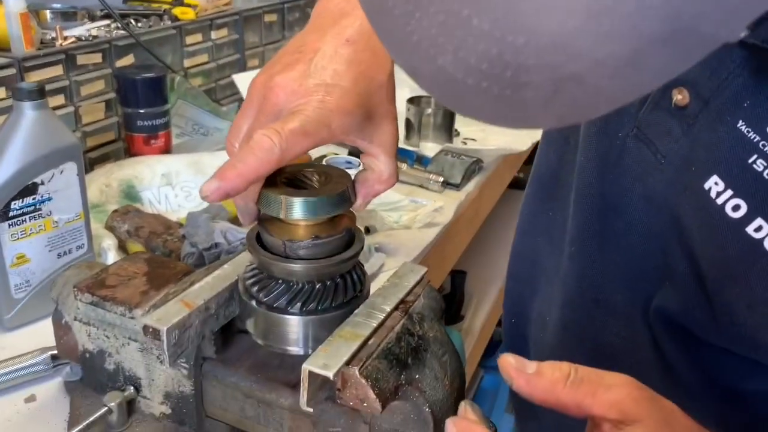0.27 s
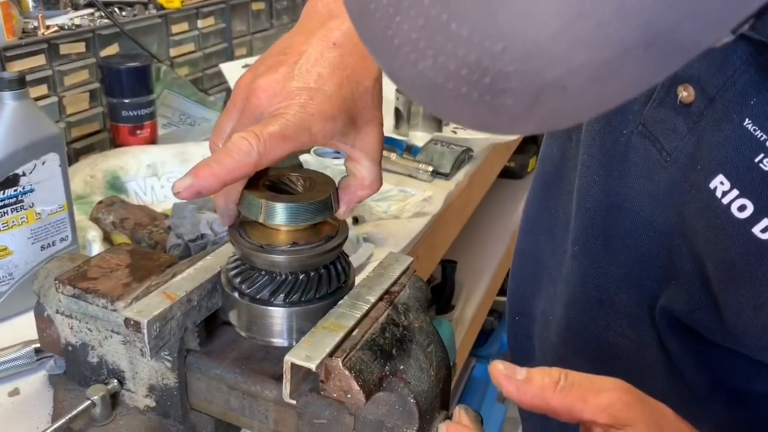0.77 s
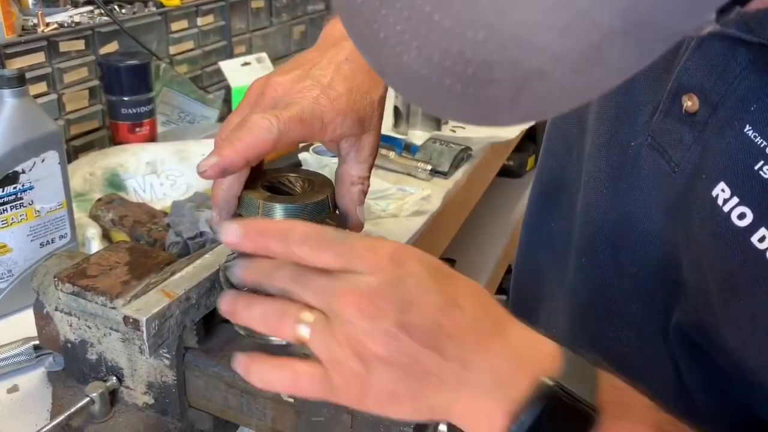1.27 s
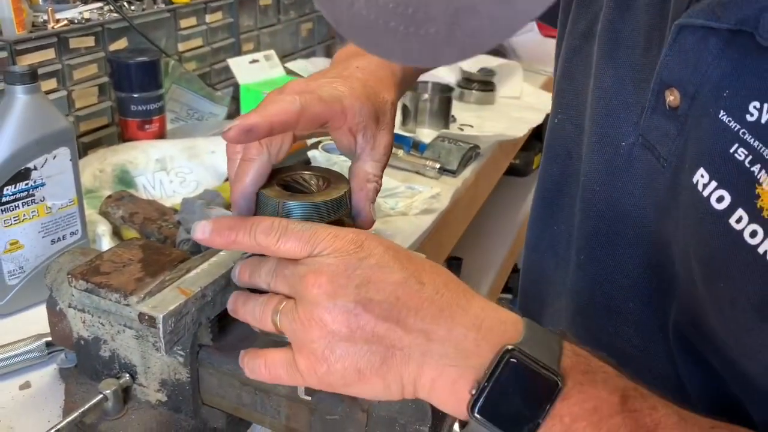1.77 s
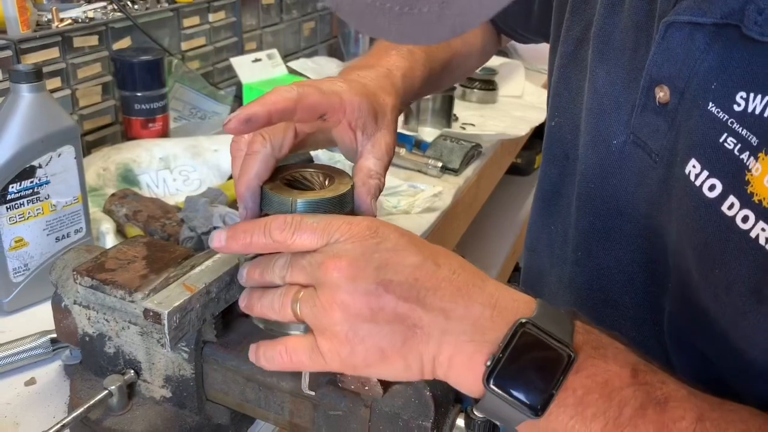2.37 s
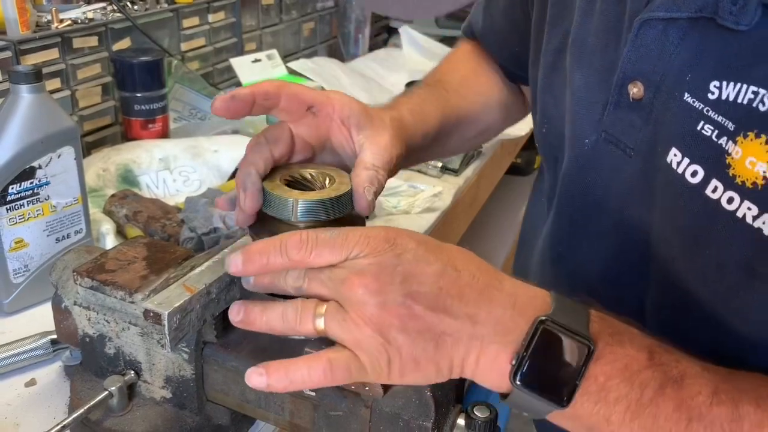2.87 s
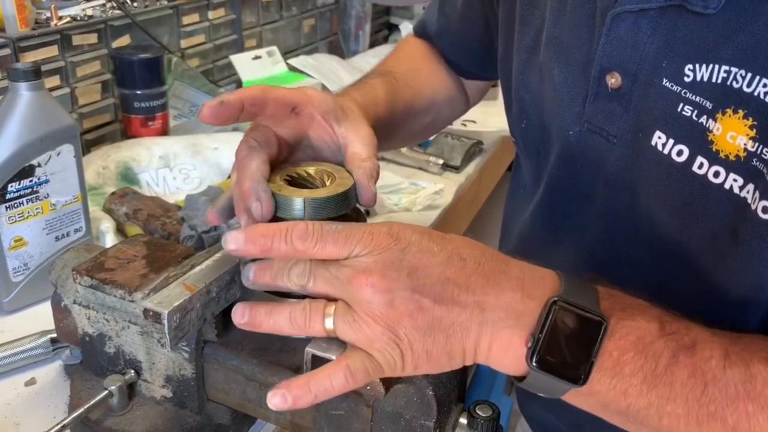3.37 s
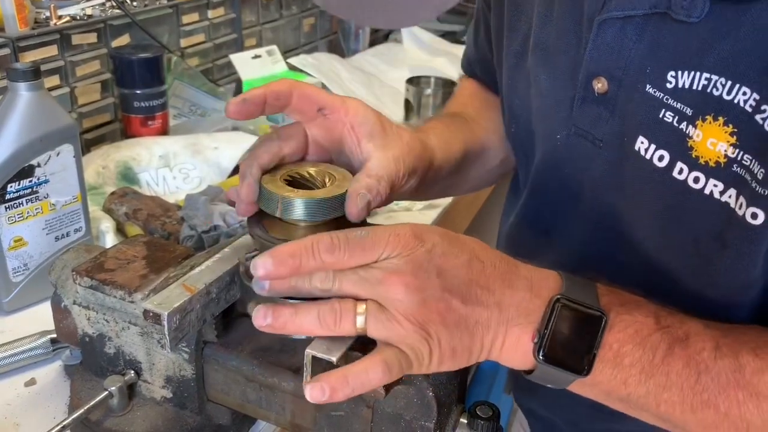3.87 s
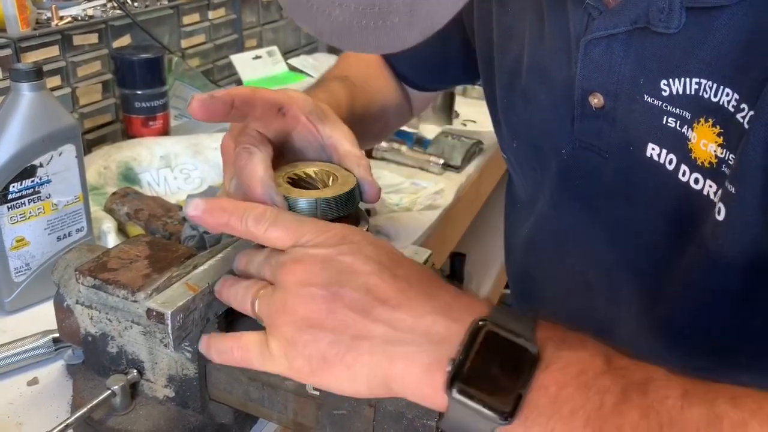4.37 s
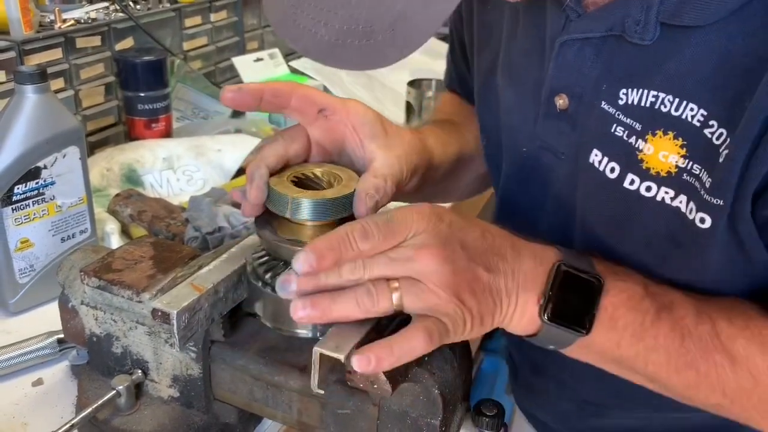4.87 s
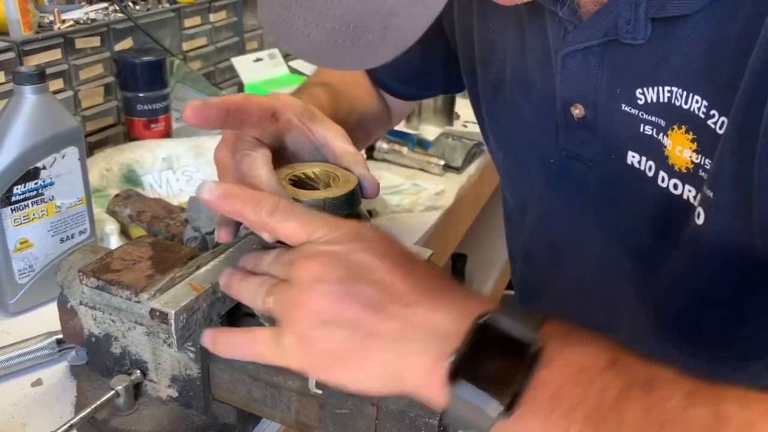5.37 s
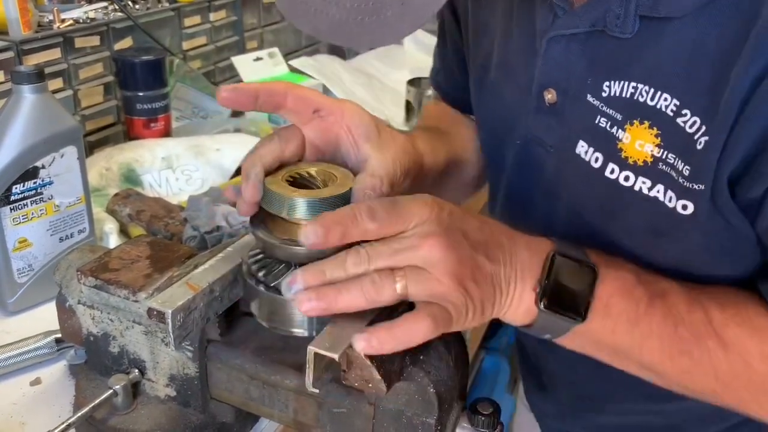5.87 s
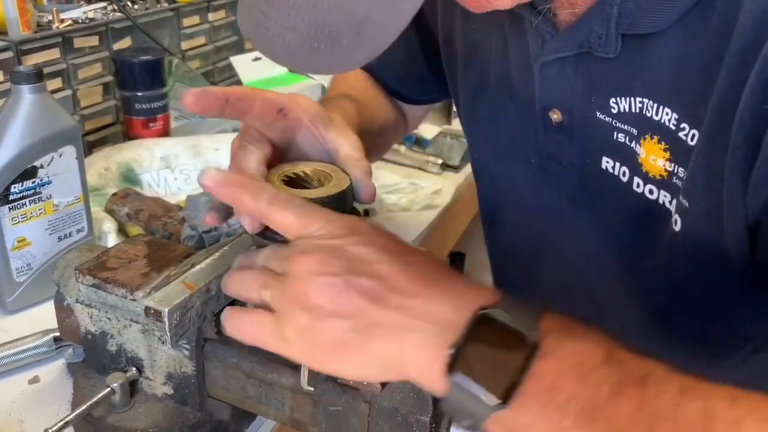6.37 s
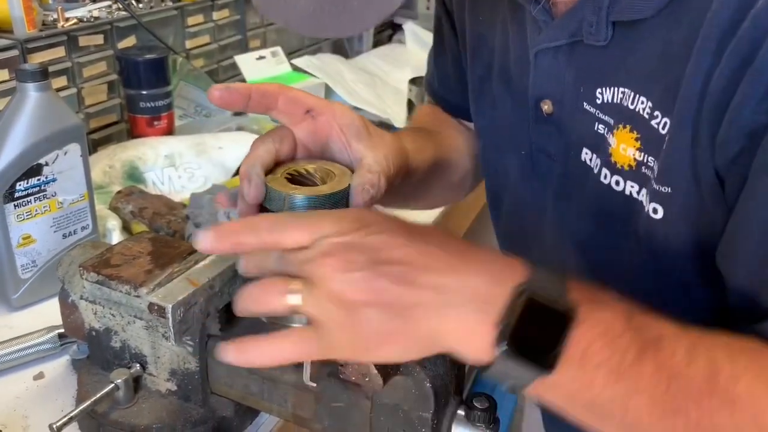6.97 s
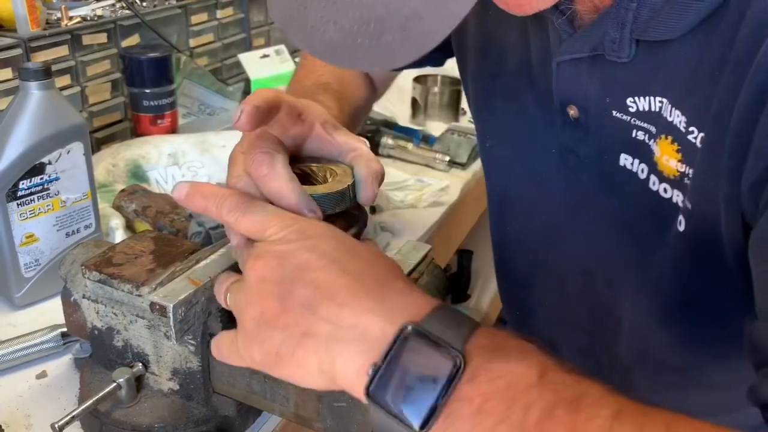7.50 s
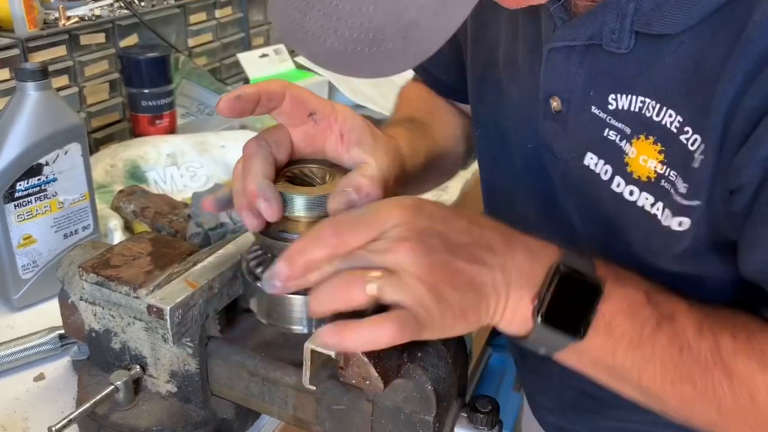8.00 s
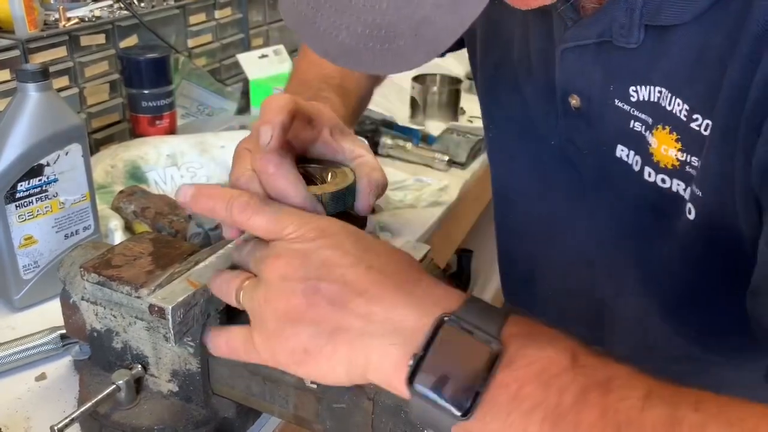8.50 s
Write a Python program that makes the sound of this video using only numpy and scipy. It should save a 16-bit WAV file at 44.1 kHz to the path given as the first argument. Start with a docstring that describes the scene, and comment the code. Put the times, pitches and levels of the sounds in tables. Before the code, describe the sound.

Gritty metal-on-metal grinding by hand in short back-and-forth scrapes, after a few knocks and ticks, with a far motor humming in a workshop.

```python
"""A metal cone is lowered into its cup, held in a bench vise, and turned to and fro by hand on grinding paste.
Random grit in the joint shakes the ringing modes of bench, cup and hard rim, and also hisses directly.
Ticks, knocks, light scuffs, thin squeaks and a soft wash of noise surround the strokes.
Behind it all a far machine throbs as a stack of shaft orders, over the noise of the shop air."""
import sys
import numpy as np
from scipy import signal
from scipy.fft import rfft, irfft, next_fast_len
from scipy.io import wavfile

SR = 44100
rng = np.random.default_rng(int(sys.argv[2]) if len(sys.argv) > 2 else 0)


def int16_out(signal):
    """Quantize to a 16-bit WAV file."""
    q = np.round(np.clip(np.atleast_2d(signal).T, -1, 1) * 32767)
    wavfile.write(sys.argv[1], SR, q.astype(np.int16))


def rack_gain(trim_db):
    """Turn a fader trim in dB into the linear factor to multiply a signal by."""
    fader = np.asarray(trim_db, float)
    return 10 ** (fader / 20)


N = 385434
SIZE = next_fast_len(N + SR // 2)  # room for ringing after the end
HZ = np.fft.rfftfreq(SIZE, 1 / SR)
T = np.arange(N) / SR

# Modes of the hard rim, then of the cone itself, which rings mostly while it hangs free. Each row: pitch in Hz,
# width in Hz, relative level in dB, left over right in dB, phase lead of the left in radians.
RIM_MODES = [(10580, 80, -10, 0, -2), (10960, 45, 0, -1, -2.8), (11150, 120, -6, 0, 3.1),
             (13200, 50, -10, 0, .1), (14330, 60, -17, 0, -.6), (14480, 60, -15, 0, -1)]
CONE_MODES = [(4600, 180, -13.5, 0.0073, -17.5), (6160, 270, 7.5, 0.04, 2.5), (6560, 120, 6, 0.0027, 3),
              (8200, 380, -4, 0.029, 4.5), (11500, 140, -23, 0.025, -1), (11900, 260, 2, 0.026, 8),
              (14030, 100, -11, 0.019, -3.5)]


def to_db(gain):
    """A factor to decibels."""
    return 20 * np.log10(gain + 1e-6)


def evened(x):
    """Scales to rms 1."""
    return x / np.sqrt(np.mean(abs(x) ** 2) + 1e-20)


def read(f, value):
    """Reads a spectrum table at every bin, along log frequency."""
    return np.interp(np.log(HZ + 1), np.log(np.add(f, 1)), value)


def through(x, response):
    """Filters x by a frequency response, or by one for each ear."""
    return irfft(rfft(x, SIZE) * response, SIZE)[..., :N]


def wander(hz):
    """Slow chance, rms 1, up to about hz."""
    return evened(through(rng.standard_normal(N), 1 / (1 + (HZ / hz) ** 2)))


def modes(table, narrower=1, third=None):
    """Response of a ringing body at both ears (or of its low, middle or high third); neighbours alternate in sign."""
    out = np.zeros((2, len(HZ)), complex)
    for k, (hz, width, db, pan_db, lead) in enumerate(table):
        if third in (None, k * 3 // len(table)):
            detuning = narrower * (HZ ** 2 - hz ** 2) / ((HZ + 1) * width)
            ring = (-1) ** k / (1 + 1j * detuning) ** 1.527
            ears = np.array([[rack_gain(pan_db / 2) * np.exp(1j * lead)], [rack_gain(-pan_db / 2)]])
            out += ring * rack_gain(db) * ears
    return out


def grit(per_s, spread_db, clump_db):
    """Grains crushed at random moments, a few large, coming in clumps."""
    size_db = spread_db * np.minimum(rng.exponential(1, N), 5) + clump_db * wander(hz=30.6)
    crushed = rng.random(N) < per_s / SR
    return evened(rack_gain(size_db) * rng.standard_normal(N) * crushed)


def shaken(table, level_db, loose, clump_db, shift_db, tilt_db=0):
    """Grit drives a body; a share reaches each ear from other spots, and the moving contact favours other modes."""
    common = grit(7000, 2.3, clump_db)
    drive = common + loose * np.array([grit(9000, 4.9, clump_db) for _ in range(2)])
    out = 0
    for third in range(3):
        favour_db = shift_db * wander(hz=3.2) + tilt_db * (third - 1)
        out = out + through(rack_gain(level_db + favour_db) * drive, modes(table, third=third))
    return out / np.hypot(1, loose) / np.sqrt(np.mean(abs(modes(table)) ** 2))


def pair(level_db, f, db, same, lead):
    """Grainy noise with a set likeness and phase lead between left and right."""
    a, b = (rfft(rack_gain(level_db) * grit(16000, 1.0, 1.6), SIZE) for _ in range(2))
    same = np.clip(read(f, same), -1, 1)
    left = a * np.exp(1j * read(f, lead))
    right = same * a + np.sqrt(1 - same ** 2) * b
    return irfft(evened(rack_gain(read(f, db))) * [left, right], SIZE)[:, :N]


def machine():
    """Shaft orders, a little spread in time by distance, throb once a turn; each wavers a little."""
    # Each row: time in seconds, turns a second in Hz, level in dB before a half-dB trim.
    speed = [(0, 14.455, -48), (1.75, 14.395, -48), (3.15, 14.437, -47), (3.85, 14.421, -48),
             (4.55, 14.352, -49), (5.25, 14.327, -50), (6.65, 14.306, -51), (8.74, 14.27, -53)]
    # Each row: multiple of the turning rate, relative level in dB.
    orders = [(1, -46), (2, -31), (3, -39), (4, -4), (5, -2), (6, 1.5), (7, -42), (8, -12), (9, -14.5),
              (10, -16), (11, -2), (12, -20.5), (13, -24.5)]
    s, hz, level_db = np.transpose(speed)
    turns = np.cumsum(np.interp(T, s, hz)) / SR + 0.84
    tones = 0
    for k, db in orders:
        waver_db = 1.1 * wander(hz=0.49)
        tones = tones + rack_gain(db + waver_db) * np.cos(2 * np.pi * k * turns + 0.1514 * k ** 2)
    return rack_gain(np.interp(T, s, level_db) - 0.5) * evened(tones)


def air():
    """The shop's rumble and faint hiss are shaped noise, swelling slowly and sinking over the whole scene."""
    # Each row: frequency in Hz, relative level in dB per Hz.
    spectrum = [(15, -47), (25, -13), (86, 0.5), (126, -12.5), (169, -4.5), (209, -18), (267, -13),
                (410, -27), (2360, -46.5), (3000, -51), (8350, -52), (11500, -54.5), (13200, -56),
                (15500, -66)]
    # Each row: frequency in Hz, left-right likeness from -1 to 1.
    likeness = [(60, 1), (180, 0.78), (550, 0.27), (1650, 0.28), (4970, -0.86), (15000, -0.16)]
    f, db = np.transpose(spectrum)
    level_db = -49.5 - 4 * (T / T[-1] - .5) + 1.7 * wander(hz=0.61)
    return pair(level_db, f, db, np.interp(f, *np.transpose(likeness)), 0 * f)


def wash():
    """A soft wash, first dull then like cloth: noise shifted around a moving centre, partly alike in the two ears."""
    # Each row: time in seconds, level in dB, centre in Hz.
    path = [(0, -70.5, 946), (.3, -58, 953), (.6, -65.5, 955), (.95, -72, 898), (1.04, -83, 900),
            (1.06, -94, 2090), (1.25, -72.5, 2200), (1.45, -71, 2250), (1.64, -73.5, 2234),
            (1.72, -100, 2280)]
    width_hz = 880
    s, *columns = np.transpose(path)
    db, hz = (np.interp(T, s, c) for c in columns)
    slow = through(rng.standard_normal((2, 2, N)), 1 / (1 + (2 * HZ / width_hz) ** 4))
    turn = 2 * np.pi * np.cumsum(hz) / SR
    sound = slow[0] * np.cos(turn) + slow[1] * np.sin(turn)
    return rack_gain(db + 1.2 * wander(hz=15)) * evened(sound + 0.14 * sound[::-1])


def scuffs():
    """Gains of light touches that swell, flicker and fade, over the low weight of the hands."""
    # Hands leaning on the bench. Each row: time in seconds, bench level in dB.
    lean = [(0, -60), (.05, -50.5), (.15, -54.5), (.22, -62), (.3, -48), (.45, -51.5), (.6, -51),
            (.85, -50.5), (.92, -62), (1.6, -60.5), (2.3, -63.5), (2.75, -68), (2.83, -46.5), (2.9, -92),
            (7.1, -59), (7.4, -72), (8.74, -68.5)]
    # Fingers and loose cone. Each row: start in seconds, length in seconds, then the levels in dB of
    # cup, upper cup modes, hiss and fizz, before the flicker.
    touches = [(0.218, .17, -71, -72, -69, -78), (.4, 0.049, -64, -70, -82, -92),
               (.5, 0.034, -94, -100, -83, -76), (.55, 0.08, -75, -95, -78, -85),
               (0.724, 0.19, -72, -90, -73, -73), (0.976, 0.032, -72, -75, -76, -74),
               (1.495, .1, -75, -78, -82, -82), (1.588, 0.091, -65.5, -71.5, -70, -69.5),
               (1.721, 0.067, -61.5, -63.5, -65.5, -70), (1.917, .33, -83, -79, -76.5, -87),
               (2.273, 0.15, -70, -76.5, -71.5, -79), (2.56, 0.19, -91, -80, -69.5, -85),
               (2.707, 0.12, -59, -54.5, -57, -72), (3.576, 0.05, -80, -74, -83, -76),
               (4.518, .06, -74, -74, -73, -74), (5.025, .05, -70, -70, -67.5, -67),
               (5.465, 0.16, -74, -82, -78, -97), (5.589, 0.038, -71, -81, -73, -74),
               (5.962, 0.18, -80, -63, -72.5, -81), (6.564, 0.11, -101, -92, -67.5, -92),
               (7.157, 0.24, -75.5, -73.5, -69.5, -69), (7.334, 0.23, -94, -85, -69.5, -71),
               (7.51, 0.52, -78, -75, -71.5, -85), (8.186, 0.15, -92, -89, -65.5, -65.5),
               (8.304, 0.31, -71, -72, -70.5, -78)]
    out = np.zeros((5, N))
    out[0] = rack_gain(np.interp(T, *np.transpose(lean)))
    for s, length, *level_db in touches:
        at = slice(round(s * SR), round((s + length) * SR))
        progress = np.clip((T[at] - s) / length, 0, 1)
        swell = abs(np.sin(np.pi * progress ** 0.84)) ** 0.88  # peaks a little early
        out[1:, at] += np.outer(rack_gain(level_db), swell)
    out[1:] *= rack_gain(1.5 * wander(hz=25.7))
    return out


def knocks():
    """A damped tone with a puff of noise around it, rising within a cycle and a half."""
    # Each row: start in seconds, level in dB, pitch in Hz, time to fade by 60 dB in seconds.
    blows = [(0.241, -60, 3250, 0.14), (.04, -32.5, 276, 0.094), (.29, -39.5, 299, 0.14),
             (0.584, -35, 297, 0.085), (0.853, -33.5, 322, 0.06), (.297, -38, 980, 0.035),
             (0.297, -51, 2810, 0.079), (0.329, -22.5, 59.7, 0.083), (.412, -41.5, 1006, 0.068),
             (0.411, -55.5, 3600, 0.11), (.86, -43, 880, 0.051), (0.87, -26.5, 65.65, 0.19),
             (1.178, -53, 1490, 0.025), (1.756, -28.5, 265, 0.081), (1.756, -36, 466, 0.073),
             (1.756, -33.5, 903, 0.037), (2.717, -38.5, 950, 0.15), (2.717, -29, 3600, 0.02),
             (2.718, -41, 4150, 0.05), (2.718, -42.5, 3250, 0.15), (3.353, -26, 227, 0.15),
             (3.608, -51, 2250, 0.071), (4.534, -65, 2100, 0.3), (4.81, -41.5, 4840, 0.076),
             (5.618, -37, 48.5, 0.41), (6.155, -28, 253, 0.4), (7.371, -56, 2720, 0.058),
             (7.88, -34, 52.6, 0.4)]
    out, t = np.zeros(N), T[:SR // 2]
    for (s, db, hz, t60), noise in zip(blows, rng.standard_normal((len(blows), len(t)))):
        band = signal.butter(2, [hz / 1.9, hz * 1.11], "band", fs=SR)
        puff = evened(signal.lfilter(*band, noise))
        share = np.clip(-db / 70 * (hz > 500), .2, .85)  # soft high knocks are more crack than tone
        sound = (1 - share) * np.sin(2 * np.pi * hz * t) + share * 0.56 * puff
        rise = 1 - np.exp(-t * hz / 0.5)
        out[round(s * SR):][:len(t)] += rack_gain(db - 60 * t / t60) * rise * sound
    return out


def ticks():
    """Metal ticks, mostly before the cone is seated: a short crack, then a longer or shorter ring."""
    # Each row: start in seconds, level in dB, time in which an added fade takes 60 dB off the ring in seconds.
    hits = [(0.2154, -66, 0.15), (0.2957, -55, 0.15), (0.4444, -64, 0.15), (0.5065, -52.5, 0.25),
            (0.5747, -57, 0.16), (0.5994, -58, 0.16), (0.715, -61, 0.15), (0.771, -55, 0.15),
            (0.7994, -53, 0.16), (0.9874, -61, 0.19), (1.538, -60, 0.15), (1.602, -54, 0.23),
            (1.755, -41.5, 0.075), (6.5494, -33.5, 0.017), (8.5944, -70, 0.15)]
    out, t = np.zeros((2, N)), T[:SR // 2]
    ring = irfft(modes(RIM_MODES + CONE_MODES, narrower=2.8), SIZE)[:, :len(t)]
    ring /= abs(ring).max()
    crack_gain = rack_gain(-1.5 - 60 * t[:200] / 0.0049)
    for (s, db, t60), crack in zip(hits, rng.standard_normal((len(hits), 2, 200))):
        sound = ring * rack_gain(-60 * t / t60)
        sound[:, :200] += crack_gain * np.diff(crack, prepend=0)
        part = out[:, round(s * SR):][:, :len(t)]
        part += rack_gain(db) * sound[:, :part.shape[1]]
    return out


def squeaks():
    """Thin wavering sines: a faint low tone and two brief squeaks."""
    # Each row: start in seconds, end in seconds, pitch in Hz, level in dB.
    tones = [(0.23, 0.74, 573, -61), (0.747, 2.01, 565, -72), (7.35, 7.412, 7850, -66),
             (8.225, 8.278, 7820, -56)]
    out = np.zeros(N)
    for start, end, hz, db in tones:
        swell = np.clip(np.minimum(T - start, end - T) / .02, 0, 1)
        out += rack_gain(db) * swell * np.sin(2 * np.pi * hz * T + .4 * wander(hz=hz / 200))
    return out


def strokes(upper_db, hiss_db, fizz_db):
    """Gains of bench, cup, upper modes, hiss and fizz: load, bite, speed up, slow down, let go."""
    # Turns of the cone. Each row: bite of the grit in seconds, time to top speed in seconds, length in seconds,
    # bench level in dB before the jolt, cup level in dB at top speed, then how far the speed is
    # under its top at the bite in dB and at the stop in dB.
    turns = [(2.373, 0.015, .17, -47, -53.5, 10, 5.5), (2.833, 0.035, 0.068, -46.5, -52, 1, 3),
             (2.92, .015, 0.09, -44, -47, 15, 6.5), (3.246, 0.11, .2, -43, -49, 7, 5),
             (3.622, 0.16, 0.24, -40.5, -44, 3, 4.5), (4.012, 0.19, 0.39, -40, -43, 6, 6.5),
             (4.547, 0.22, 0.31, -39, -39.5, 10.5, 6), (5.047, .25, 0.4, -38.5, -43, 7, 7.5),
             (5.594, 0.21, .37, -40.5, -37.5, 14.5, 15), (6.121, 0.054, .43, -41.5, -43, 10, 5.5),
             (6.761, .3, .36, -42, -43.5, 9, 2), (7.712, .33, 0.4, -46.5, -46, 13, 11.5),
             (8.62, 0.1, .15, -49, -54, 3.5, -5)]
    # Level gained per dB of speed, in dB: bench, cup, upper cup modes, hiss, fizz.
    follow = [0.27, 0.92, 1.55, 0.75, 0.65]
    # The hand loads the joint just before the bite: dB relative to the stroke, in the same order.
    creep_db = [-15.5, -30, -14, -18, -28]
    creep_s, bite_s = 0.024, 0.024
    jolt_db, jolt_s = 4, 0.16  # the bite jolts the bench
    treble_share, treble_from_db = 0.69, -43.5  # hiss and fizz follow the strength of a stroke only in part
    release_db_per_s = np.array([357, 433, 433, 433, 433])
    out = np.zeros((5, N))
    for s, top, length, bench_db, cup_db, start_db, stop_db in turns:
        at = slice(round((s - creep_s) * SR), round((s + length + .25) * SR))
        t = T[at] - s
        speeding = np.clip(1 - t / top, 0, 1)
        slowing = np.clip((t - top) / (length - top), 0, 1) ** 1.73
        speed_db = -start_db * speeding - stop_db * slowing
        part_db = treble_share * (cup_db - treble_from_db)
        peak_db = [bench_db + jolt_db * np.exp(-abs(t) / jolt_s), cup_db + 0 * t, cup_db + upper_db[at],
                   hiss_db[at] + part_db, fizz_db[at] + part_db]
        release_db = np.outer(release_db_per_s, np.maximum(t - length, 0))
        level_db = peak_db + np.outer(follow, speed_db) - release_db
        creep = np.outer(rack_gain(creep_db), np.minimum(1 + t / creep_s, 1))
        out[:, at] += rack_gain(level_db) * np.maximum(np.clip(t / bite_s, 0, 1), creep)
    judder_db = np.outer([0.5, 0.235, 0.335, 0.25, 0.2], wander(hz=5))
    return out * rack_gain(judder_db)


def lapping():
    """Strokes and scuffs drive bench, cup, rim, cone and bare hiss."""
    # Modes of vise and bench, of cup and shaft, and of the upper cup. Each row: pitch in Hz, width in Hz,
    # relative level in dB, left over right in dB, phase lead of the left in radians.
    bench_modes = [(200, 60, -14, 0, 0), (262, 45, 0, 0, .1), (290, 40, -3, 0, 0), (345, 55, -6, -2, .2),
                   (445, 45, -8, 0, .2), (525, 55, -14, 0, .6), (625, 50, -14, 1, .4)]
    cup_modes = [(770, 90, -12, 2, -.3), (905, 75, -5, 0, .2), (1100, 55, -9, 4, .6),
                 (1250, 65, -3.5, 9, .6), (1350, 60, -7, 5, 0), (1450, 70, -10, 0, 2.5),
                 (1550, 50, 0, 3, .3), (1640, 80, -2, 4, -1)]
    upper_modes = [(1880, 100, 0, 2, -2.4), (1945, 45, -1, 2, 0), (2110, 85, -3, 3, 2.3),
                   (2260, 95, -2, 2, 3), (2390, 75, 0, 1, -.2), (2700, 75, -7, -1, -.4),
                   (2960, 150, -21, 0, 3), (3300, 250, -24, 0, 1)]
    # Grit heard directly, lower and higher. Each row: frequency in Hz, relative level in dB per Hz,
    # left-right likeness from 0 to 1, phase lead of the left in radians.
    hiss_spectrum = [(2340, -11.5, 1, 0), (3600, 0.5, 0.99, 2.5), (5420, -4.5, 0.1, -3.5),
                     (7000, 0.5, 0.1, -4.5), (9000, -6.5, 0.72, -5), (10600, -4.5, 0.6, -9.5),
                     (11000, -34, .8, -7)]
    fizz_spectrum = [(10000, -42, .9, -1.3), (10300, -13, .9, 1.5), (10800, -10, .97, -2.5),
                     (11400, -7, .995, -3), (11930, 8, 0.86, -3), (13000, 5.5, .97, -7),
                     (14040, -2, 0.81, -6.5), (14400, -14, 0.73, -2), (15600, -40, .6, -2)]
    # Slow change of the joint as the paste works in. Each row: time in seconds, upper modes over cup in dB,
    # hiss in dB, fizz in dB, rim ring over fizz in dB, tilt to the higher modes of the cup in dB and of
    # the upper cup in dB; levels stand before the strokes and trims.
    wear = [(0, 0.1, -56, -59, 10.5, -8, 0), (2.3, -1, -53.5, -54, 12.5, -5, 5),
            (3.4, 1, -54.5, -56, 5, -1.7, 3), (4.2, -1.5, -55.5, -60.5, 11, -2.1, .1),
            (4.75, 3.1, -53.5, -54.5, 6.5, 0.6, 4.5), (5.3, 5, -54.5, -59, 6.5, -3.5, 0.5),
            (5.8, 5, -52.5, -58.5, 9.5, 2.5, 5), (6.4, 4, -55.5, -60.5, 8, -2, -1.5),
            (7.05, 9.5, -50.5, -57, 9, -1.2, 5), (7.25, 5, -48, -54, -5, -4, 4),
            (7.75, 9.5, -58.5, -55, -19, -4.5, 12.5), (8.05, 15, -46.5, -48, -3, -4.5, 8),
            (8.7, 7.5, -53, -52, -1, -6, 5.5)]
    seated_s, seating_s, loose = 1.84, .4, 0.095  # once settled, only a small share of the cone still rings

    s, *columns = np.transpose(wear)
    upper_db, hiss_db, fizz_db, ring_db, cup_tilt, upper_tilt = (np.interp(T, s, c) for c in columns)
    bench, cup, upper, hiss, fizz = to_db(strokes(upper_db, hiss_db, fizz_db) + scuffs())
    free = np.clip(loose + (seated_s - T) / seating_s, loose, 1)

    body = shaken(bench_modes, bench, 0.27, 1.9, 0.14)
    body += shaken(cup_modes, cup + 0.56, 0.48, 1.0, 1.76, cup_tilt)
    body += shaken(upper_modes, upper + 1.29, 0.7, 1.9, 1.98, upper_tilt)
    ring = shaken(RIM_MODES, fizz + ring_db, 0.19, 2.6, 1.0)
    ring += free * shaken(CONE_MODES, hiss + 1.0, 1.0, 2.1, 2.8)
    # while the cone hangs free there is less bare hiss
    bare = pair(hiss + 0.9 - 6 * free, *np.transpose(hiss_spectrum))
    bare += pair(fizz + 0.7 - 4 * free, *np.transpose(fizz_spectrum))
    return body + ring + bare


def scene():
    """Work close by, shop behind."""
    return lapping() + ticks() + knocks() + squeaks() + wash() + machine() + air()


def roll_off(x):
    """The treble ends steeply here."""
    return signal.sosfilt(signal.butter(12, 15730, fs=SR, output="sos"), x)


def record(dry):
    """The top treble is cut steeply near 14.9 kHz, leaving a faint trace."""
    mix = through(dry, 1 / (1 + (HZ / 14900) ** 40) + 0.022)
    return roll_off(mix)


dry = scene()
out = record(dry)
int16_out(out)
```